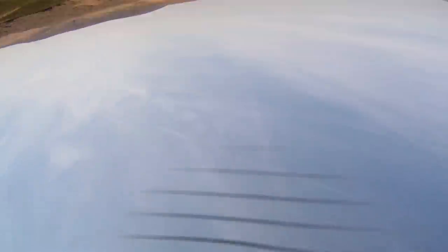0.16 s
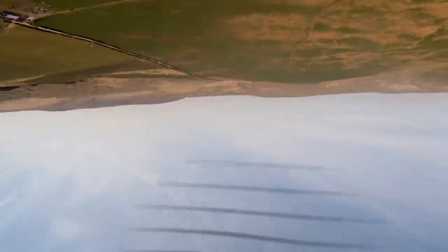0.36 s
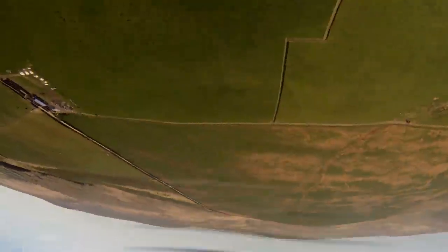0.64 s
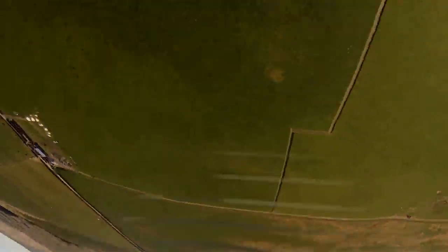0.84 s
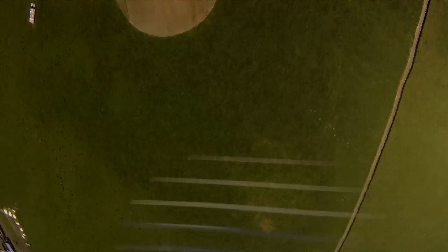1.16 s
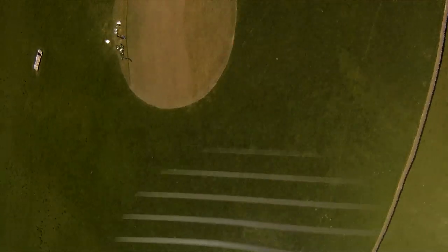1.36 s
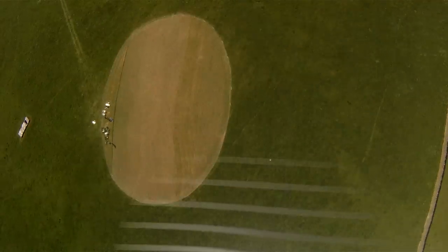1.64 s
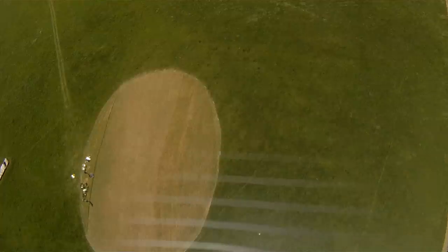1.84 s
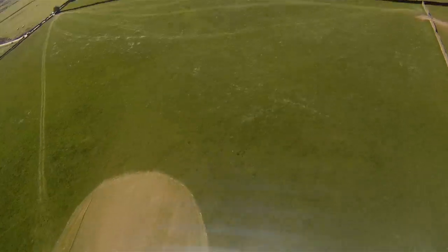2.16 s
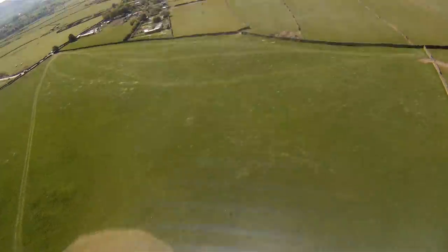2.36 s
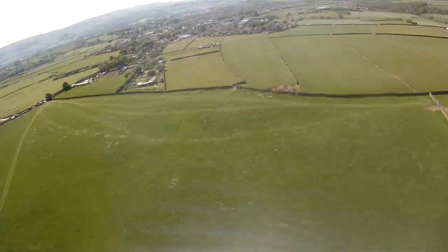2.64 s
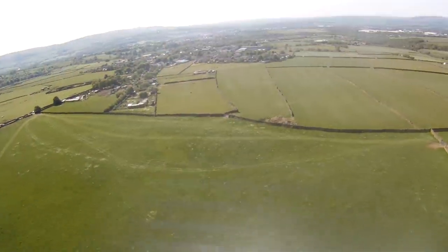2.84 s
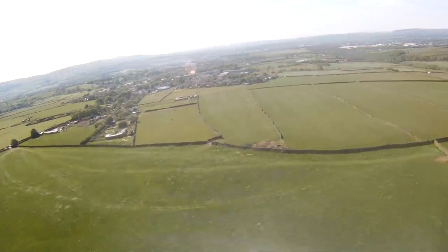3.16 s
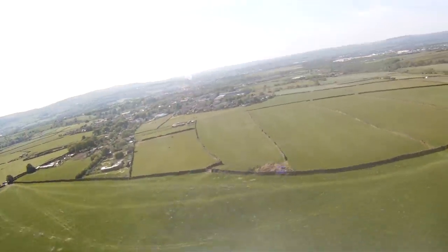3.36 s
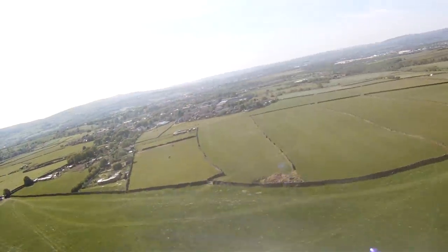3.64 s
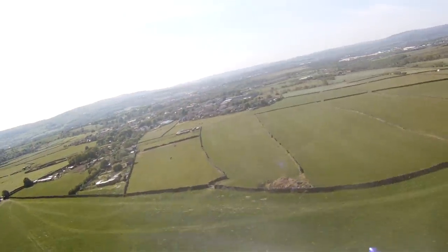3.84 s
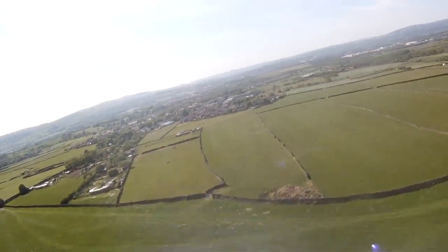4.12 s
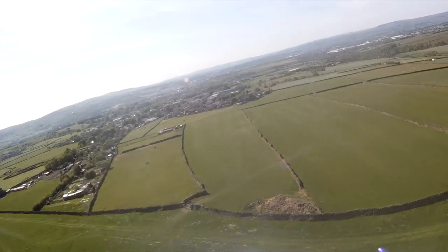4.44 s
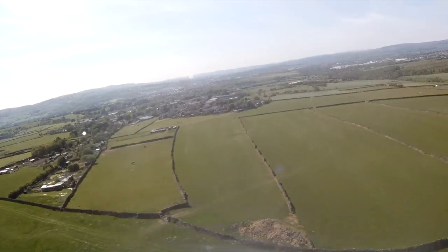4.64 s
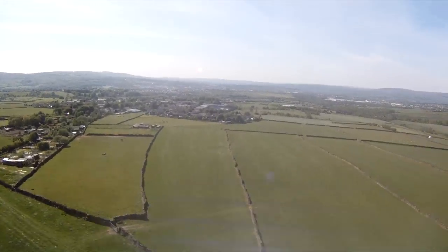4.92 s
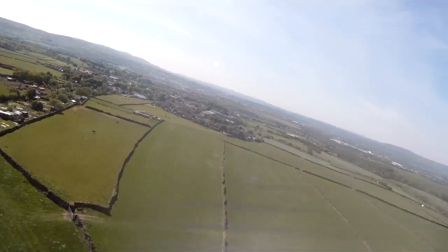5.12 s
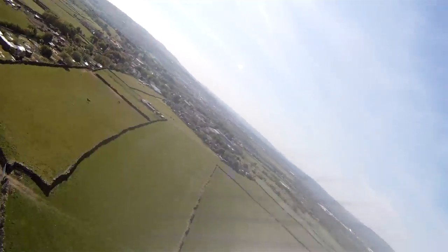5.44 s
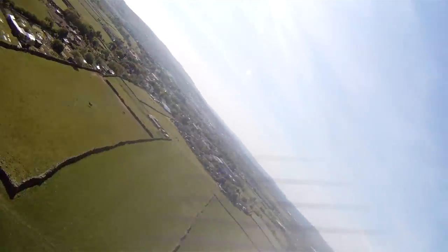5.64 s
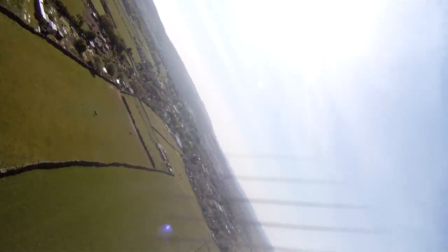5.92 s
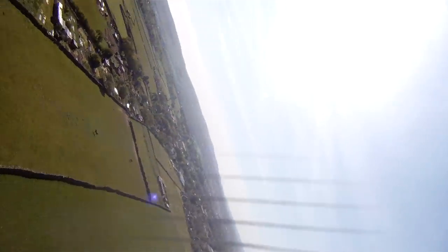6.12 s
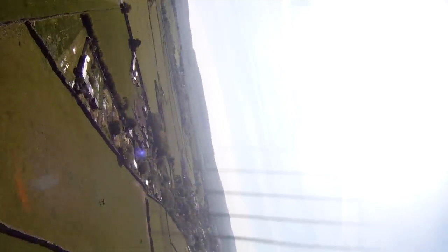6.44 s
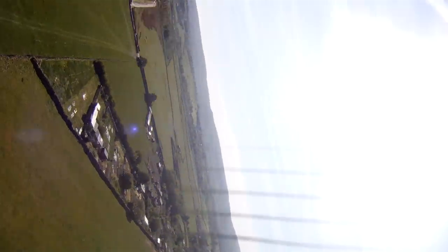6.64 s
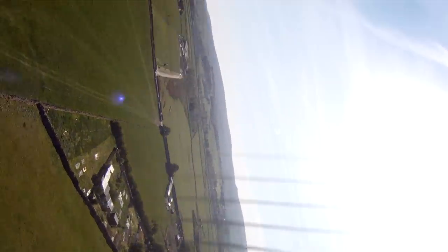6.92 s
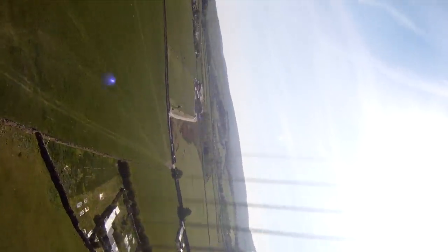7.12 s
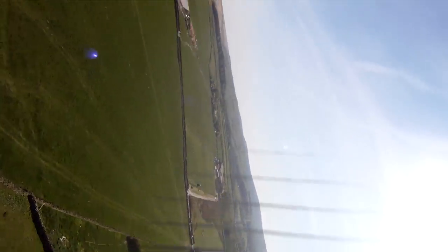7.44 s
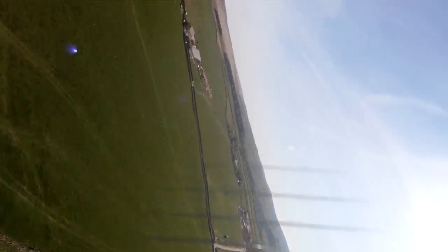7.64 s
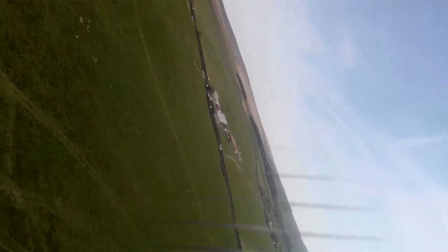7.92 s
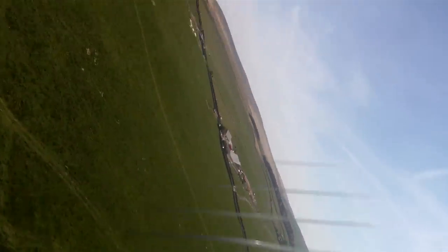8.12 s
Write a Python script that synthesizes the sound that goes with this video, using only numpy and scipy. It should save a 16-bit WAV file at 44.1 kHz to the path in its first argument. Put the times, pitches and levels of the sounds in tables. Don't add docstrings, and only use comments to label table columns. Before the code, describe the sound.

Onboard a model aircraft, a raspy high-speed engine drone starts rough, smooths and rises, then drops in pitch and softens amid rushing wind.

```python
import sys
import numpy as np
from scipy import signal
from scipy.fft import rfft, irfft, next_fast_len
from scipy.io import wavfile
from scipy.ndimage import map_coordinates

SR = 44100
rng = np.random.default_rng(int(sys.argv[2]) if len(sys.argv) > 2 else 0)


def decibels_to_gain(level_db):
    exponent = np.asarray(level_db, float) / 20
    return 10 ** exponent


def store_wav(level_fs):
    pcm = np.round(np.clip(np.atleast_2d(level_fs), -1, 1) * 32767)
    wavfile.write(sys.argv[1], SR, pcm.T.astype(np.int16))


N = 364707

# pitch in Hz, level in dB per Hz.
BUFFET = [(12, -43), (20, -52), (42, -10), (65, 2.5), (90, -4), (124, -3.5), (135, -20), (180, -31),
          (300, -120)]
# pitch in Hz, level in dB per Hz.
RUSH = [(100, -120), (130, -3), (220, -6.5), (420, -12.5), (700, 1), (1000, -1), (1200, 1.5), (1420, -6.5),
        (1700, 0), (3000, -5.5), (5000, -21.5), (5900, -28.5), (6000, -120)]
# centre in Hz, width in Hz, depth in dB.
HOLLOWS = [(3110, 150, -5.5), (3450, 69, -8), (4125, 82, -4), (4670, 90, -3.5)]
# start in seconds, peak in dB, length in seconds.
RATTLES = [
    (0.083, 2, 0.023),
    (0.23, -12, 0.02),
    (0.418, 0, 0.019),
    (0.455, -1, 0.02),
    (0.776, -3, 0.026),
    (1.2072, -4, 0.022),
    (1.3852, -11, 0.022),
    (1.4187, 2, 0.063),
    (1.503, 0, 0.022),
    (1.644, 1, 0.043),
]
# centre in Hz, width in Hz, level in dB.
CASE = [(1651, 130, -8.5), (1923, 243, -1), (2278, 74, -8.5)]
# time in seconds, rise in dB.
SURGES = [(0.09, 3), (0.79, 4), (0.99, 5), (1.46, 2), (1.66, 1), (1.91, 1), (2.01, 2), (2.12, 0), (2.95, 1),
          (3.37, 2), (3.91, 3), (6.29, 2), (7.13, 4)]
# centre in Hz, width in Hz, level in dB.
EXHAUST = [(3703, 195, 0), (3907, 183, -1)]
# centre in Hz, width in Hz, level in dB.
BLADES = [(2510, 670, -4.5), (3257, 530, -3)]
# centre in Hz, width in Hz, level in dB.
TIPS = [(4150, 420, 4), (4610, 330, 1), (5200, 510, -3), (5800, 600, -16.5)]
# time in seconds, shaft turns per second (Hz), firing tone in dB.
ENGINE = [(0.0, 160.2, -16.5), (0.8, 161.1, -17), (0.94, 160.6, -17), (1.5, 161.8, -16.5),
          (1.98, 164.8, -16.7), (2.19, 167, -15.5), (3.09, 172.4, -13.5), (3.72, 174.8, -13),
          (4.28, 176.9, -12.5), (5.0, 177, -14), (6.1, 171.9, -15.5), (6.93, 168.3, -14),
          (6.98, 167.3, -15), (7.07, 160.3, -19.5), (7.21, 151.2, -17), (7.37, 149.4, -14.5),
          (7.81, 141.9, -14.5), (8.27, 140.4, -13.5)]
# time in seconds, effort in dB.
EFFORT = [(0.0, 0.5), (1.33, 1.5), (1.9, 1.5), (2.3, 2), (3.1, 0.6), (3.7, -0.2), (5.5, -0.5), (6.2, -0.5),
          (6.8, 2.5), (7.2, -0.5), (7.5, -3.5), (7.83, -8), (8.27, -8)]
# time in seconds, unevenness from 0 to about 2, half orders in dB.
RUNNING = [
    (0, 2.4, -14),
    (1.6, 0.9, -5),
    (2.4, 0.61, -5),
    (5.5, 0.85, 2.5),
    (6.9, 1.12, -2),
    (7.2, 1.09, -5),
    (8.27, 1.1, -3),
]
# multiple, level in dB.
SHAKE = [(2, 0.77), (3, -2), (4, -1), (5, 1.5), (6, 4), (7, 3), (8, 4.5), (9, 3.5), (10, 5), (11, 1),
         (12, -0.5), (13, -1), (14, 0), (15, -4)]
# multiple of the shaft speed, level in dB.
HALVES = [(1.5, -49), (2.5, -51)]
# centre in Hz, width in Hz, level in dB.
AIRFRAME = [(299, 31, -27.0), (334, 21, -26.8), (353, 33, -26.5), (425, 13, -31.5), (481, 12, -32.9),
            (531, 28, -22.3), (604, 80, -25.0), (662, 69, -26.0), (717, 35, -26.0), (745, 39, -23.6),
            (819, 61, -28.4), (860, 45, -30.4), (905, 21, -29.8), (965, 57, -34.9), (1044, 74, -35.3),
            (1126, 120, -35.0), (1237, 31, -28.6), (1301, 85, -35.5), (1456, 180, -46.3), (1453, 29, -41.8),
            (1632, 16, -30.6), (1601, 38, -31.7), (1696, 146, -29.7), (1776, 12, -41.6), (1894, 124, -28.3),
            (1984, 107, -27.1), (2118, 145, -29.9), (2258, 55, -36.7), (2323, 150, -37.2),
            (2511, 443, -40.2)]

# level in dB, then dB per dB of effort
HISS, SLIPSTREAM, WHISTLE, RINGING = (-29, 1.08), (-26, 0.54), (-44, 1), (-20, 0.93)
BUFFET_DB, GUST_DB, GUSTS_PER_S = -34, 2, 9
SURGE_S, LULL_S, LULL_SHARE = 0.032, 0.073, 0.36
DIVE_WHISTLE_DB, PULL_OUT_S, PULL_OUT_DB, PULL_FADES_S = -3, 2.01, 4, 0.8
PUFF_EVEN, PUFF_UNEVEN = 0.15, 0.35
STUMBLE_S, STUMBLE_LASTS_S, STUMBLE_DB = 7.1, 0.069, -1.04
ALIGNS_HZ = (164, 170)
TOP_SPEED_HZ, CASE_LAG = 176.5, 0.42
HOLD = 4


def unit(x):
    return x / np.sqrt(np.mean(x ** 2) + 1e-20)


def curves(rows):
    s, *cols = np.transpose(rows)
    return [np.interp(np.arange(N) / SR, s, c) for c in cols]


def wobble(rate):
    at = np.arange(0, N + 64, 64)
    knots = rng.standard_normal(int(N * rate / SR) + 4)
    return np.interp(np.arange(N), at, map_coordinates(knots, [at * rate / SR]))


def bumps(rows, width_s):
    t = np.arange(N) / SR
    return sum(db * np.exp(-((t - s) / width_s) ** 2) for s, db in rows)


def driven(layer):
    level_db, db_per_effort = layer
    return level_db + db_per_effort * curves(EFFORT)[0]


def along(points):
    f, v = np.transpose(points)
    return lambda hz: decibels_to_gain(np.interp(np.log(hz + 1), np.log(f + 1), v))


def resonances(modes):
    return lambda hz: np.sqrt(sum((decibels_to_gain(db) / (1 + (2 * (hz - c) / w) ** 2)) ** 2 for c, w, db in modes))


def hollows(hz):
    return decibels_to_gain(sum(db * np.exp(-((hz - c) / w) ** 2) for c, w, db in HOLLOWS))


def coloured(x, gain):
    m = next_fast_len(N + SR // 4)
    return unit(irfft(rfft(x, m) * gain(np.fft.rfftfreq(m, 1 / SR)), m)[:N])


def gated(swing_db, modes):
    noise = decibels_to_gain(swing_db) * rng.standard_normal(N)
    return coloured(noise, lambda hz: resonances(modes)(hz) * hollows(hz))


def wind():
    buffet = coloured(rng.standard_normal(N), along(BUFFET))
    swing_db = 1.2 * wobble(20) + 0.5 * curves(RUNNING)[0] * wobble(8)
    noise = decibels_to_gain(swing_db) * rng.standard_normal(N)
    rush = coloured(noise, lambda hz: along(RUSH)(hz) * hollows(hz))
    return decibels_to_gain(BUFFET_DB + GUST_DB * wobble(GUSTS_PER_S)) * buffet + decibels_to_gain(driven(SLIPSTREAM)) * rush


def rattles():
    t = np.arange(N) / SR
    swell = 0
    for s, db, span in RATTLES:
        half = span / 2
        swell = swell + decibels_to_gain(db - 12.0) * np.exp(-((t - s - half) / half) ** 2)
    ring_hz = CASE[1][0] + 40 * wobble(60)
    return swell * np.sin(2 * np.pi * np.cumsum(ring_hz) / SR)


def tip_whistle(lumps):
    since = np.arange(N) / SR - PULL_OUT_S
    pull_db = PULL_OUT_DB * np.exp(-abs(since) / PULL_FADES_S)
    tip_db = driven(WHISTLE) + np.where(since < 0, DIVE_WHISTLE_DB, pull_db)
    return decibels_to_gain(tip_db + 2.5) * gated(0.68 * lumps, TIPS)


def blade_hiss(angle, lumps):
    wake_db = 8 * np.cos(2 * angle - 1.5)
    return decibels_to_gain(driven(HISS) - 1.0) * gated(0.19 * lumps + wake_db, BLADES)


def exhaust_puffs(angle, lumps):
    share = PUFF_EVEN + PUFF_UNEVEN * curves(RUNNING)[0]
    puff_db = 7.5 * share * np.cos(angle - 2.1) + 4 * np.cos(2 * angle - 2.8)
    return decibels_to_gain(driven(HISS) - 1.1) * gated(0.07 * lumps + puff_db, EXHAUST)


def case_ringing(angle, lumps):
    jolts_db = (1 + LULL_SHARE) * bumps(SURGES, SURGE_S) - LULL_SHARE * bumps(SURGES, LULL_S)
    case_db = driven(RINGING) + jolts_db
    return decibels_to_gain(case_db - 0.43) * gated(0.95 * lumps + 0.48 * np.cos(angle + 0.18), CASE)


def shaft():
    hz = curves(ENGINE)[0] + 0.14 * wobble(30)
    return hz, 2 * np.pi * np.cumsum(hz) / SR


def order_lead(k, hz):
    if k >= 10:
        return 2.2 - 2 * (k == 10) - CASE_LAG * (TOP_SPEED_HZ - hz) + 0.5 * wobble(1.5)
    lead = 2.2 * (k - 1) - 0.32 * (k - 1) ** 2
    if k > 4:
        in_step = np.interp(hz, ALIGNS_HZ, [0, 1])
        lead = lead + in_step * np.angle(np.exp(1j * (2.2 - lead))) + 0.5 * wobble(0.6)
    return lead


def half_orders(angle, uneven, half_db):
    tone = 0
    for k, db in HALVES:
        level_db = db + half_db + 4.4 * wobble(6)
        tone = tone + decibels_to_gain(level_db) * np.cos(k * angle + 2.0 * wobble(4))
    skip_db = -47 + 6.2 * uneven + 1.5 * wobble(9)
    return tone + decibels_to_gain(skip_db) * np.cos(angle / 2 + 0.66 * wobble(7.6))


def engine_orders(hz, angle):
    uneven, half_db = curves(RUNNING)
    effort_db = curves(EFFORT)[0]
    stumble_db = bumps([(STUMBLE_S, STUMBLE_DB)], STUMBLE_LASTS_S)
    tone = decibels_to_gain(curves(ENGINE)[1]) * np.cos(angle)
    for k, (_, db) in enumerate(SHAKE, 2):
        frame_gain = np.repeat(resonances(AIRFRAME)(k * hz[::64]), 64)[:N]
        flutter_db = uneven * ((0.6 + 0.7 * (k > 4)) * wobble(7) + 0.07 * k * wobble(16))
        level_db = db + effort_db + min(k, 8) * stumble_db + flutter_db
        phase = k * angle + order_lead(k, hz) + 0.03 * k * wobble(9)
        tone += frame_gain * decibels_to_gain(level_db) * np.cos(phase)
    return np.sqrt(2) * (tone + half_orders(angle, uneven, half_db))


def scene():
    hz, angle = shaft()
    lumps = curves(RUNNING)[0] * wobble(35)
    air = wind() + tip_whistle(lumps) + blade_hiss(angle, lumps)
    body = rattles() + exhaust_puffs(angle, lumps) + case_ringing(angle, lumps)
    return (air + body + engine_orders(hz, angle))[None]


def roll_off(x):
    return signal.sosfilt(signal.butter(12, 15320, fs=SR, output="sos"), x)


def record(dry):
    keep = np.exp(-1 / (0.025 * SR))
    power = signal.lfilter([1 - keep], [1, -keep], dry ** 2, zi=[[0.06]])[0]
    steady = dry * (power / 0.056) ** -0.25
    steady = steady / (1 + abs(steady / 0.95) ** 6) ** (1 / 6)
    slow = signal.resample_poly(steady, 40, 147, axis=1)
    slow = slow + decibels_to_gain(-57) * rng.standard_normal(slow.shape)
    stairs = np.repeat(slow, HOLD, axis=1)
    held = signal.resample_poly(stairs, 147, 160, axis=1)[:, :N]
    return roll_off(held)


dry = scene()
out = record(dry)
store_wav(out)
```